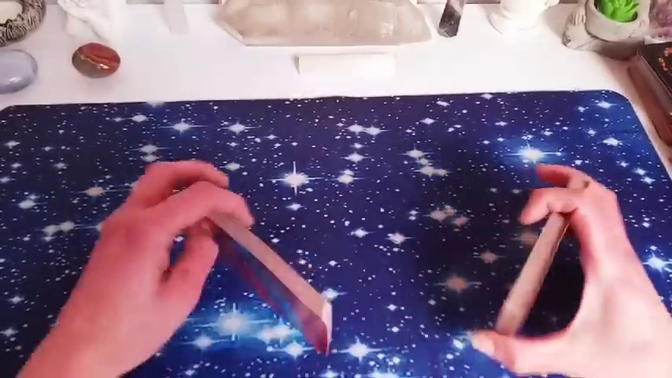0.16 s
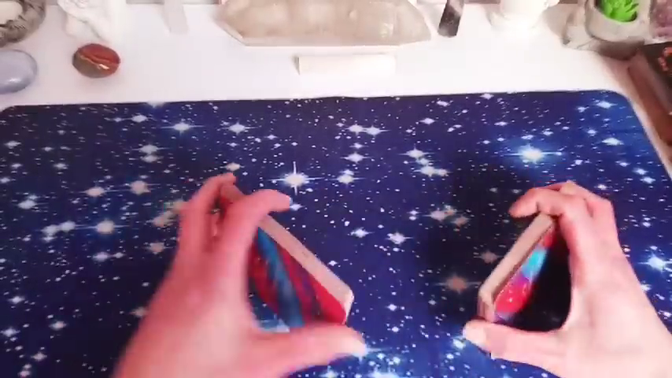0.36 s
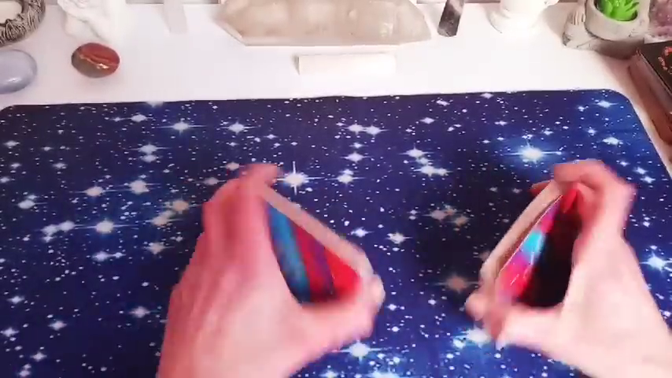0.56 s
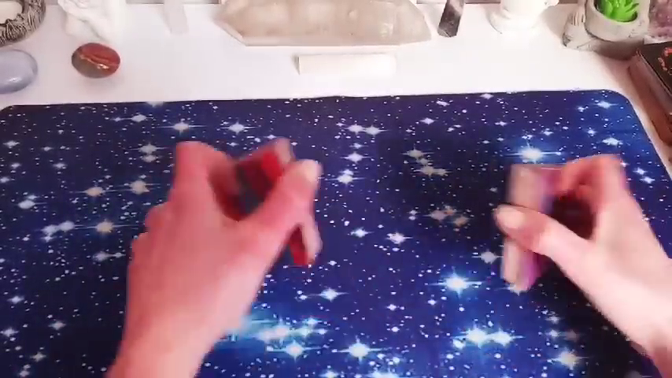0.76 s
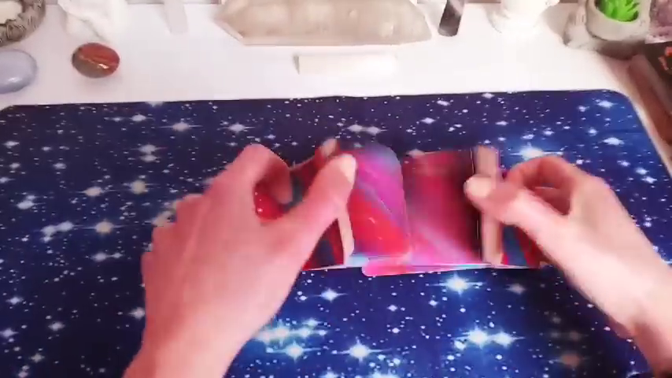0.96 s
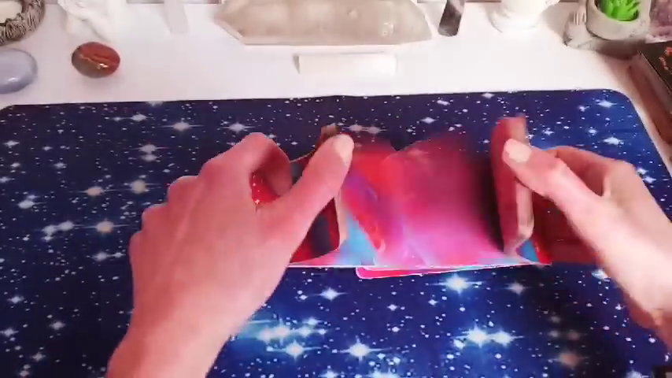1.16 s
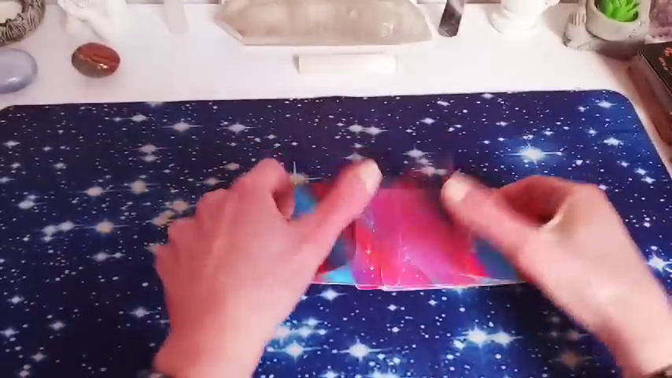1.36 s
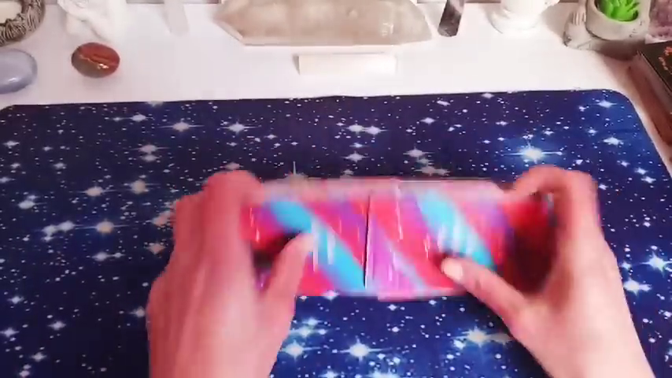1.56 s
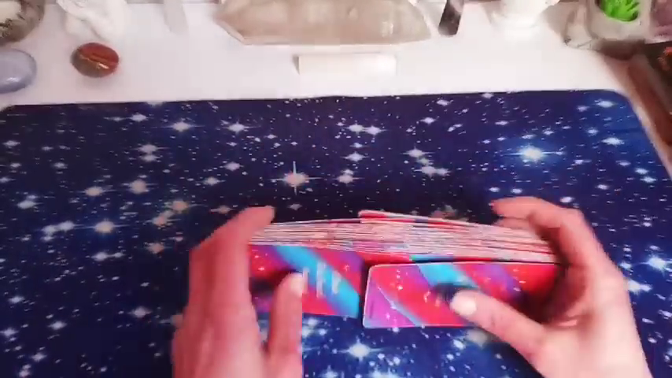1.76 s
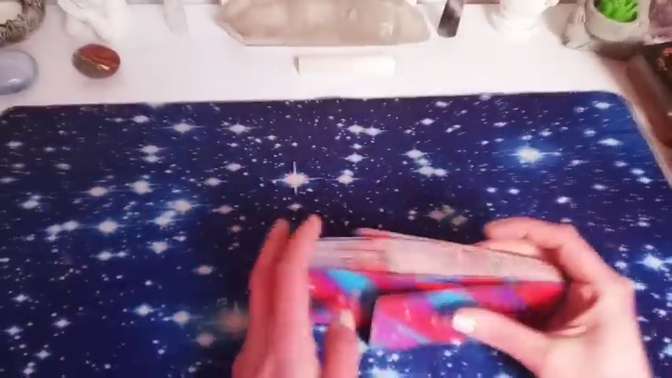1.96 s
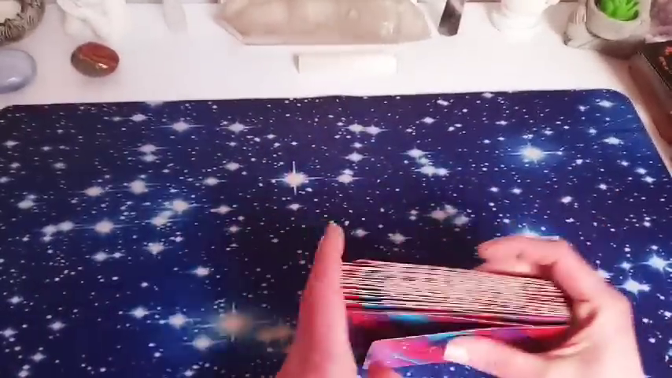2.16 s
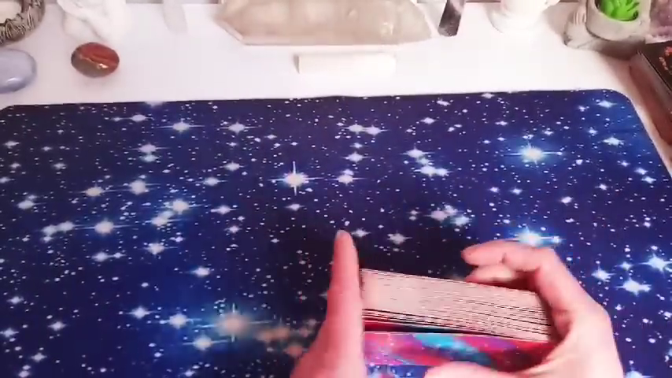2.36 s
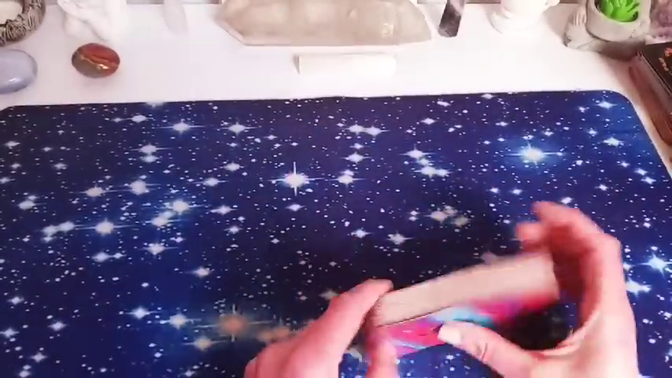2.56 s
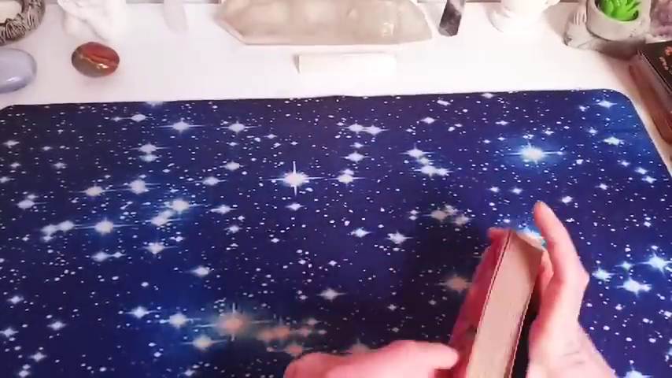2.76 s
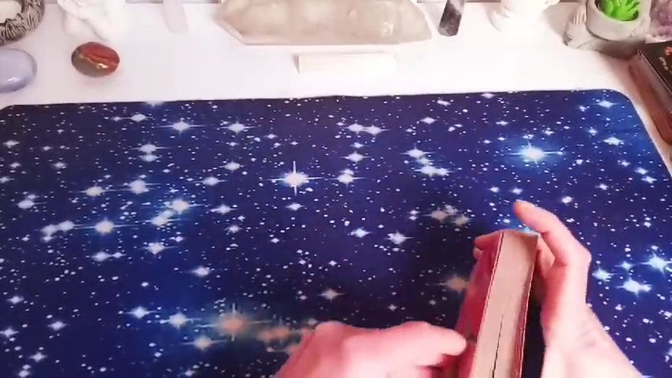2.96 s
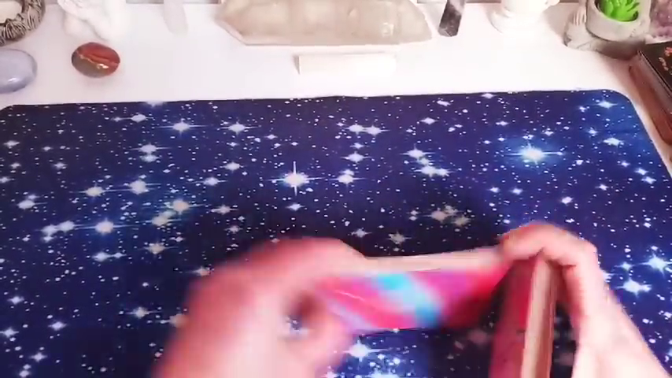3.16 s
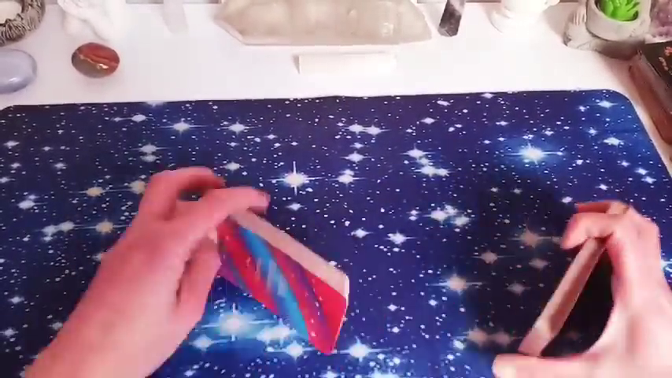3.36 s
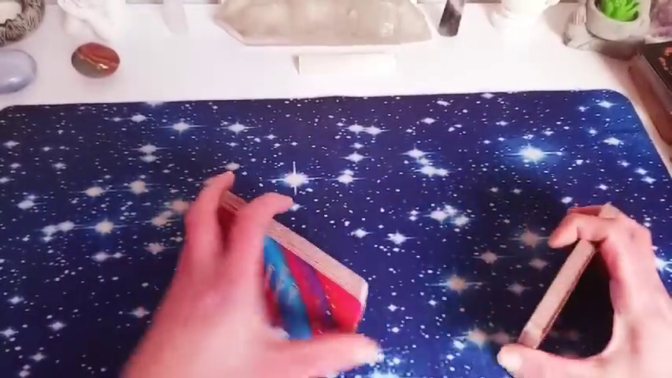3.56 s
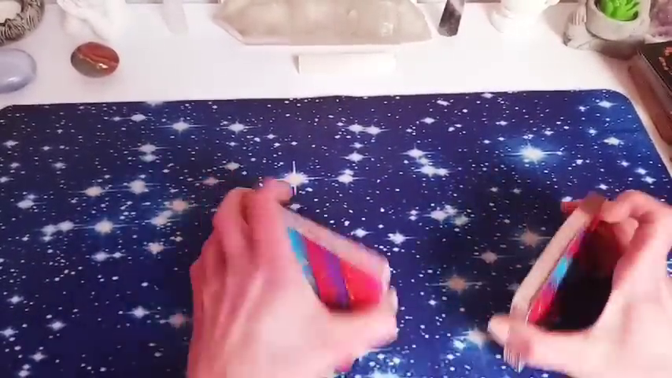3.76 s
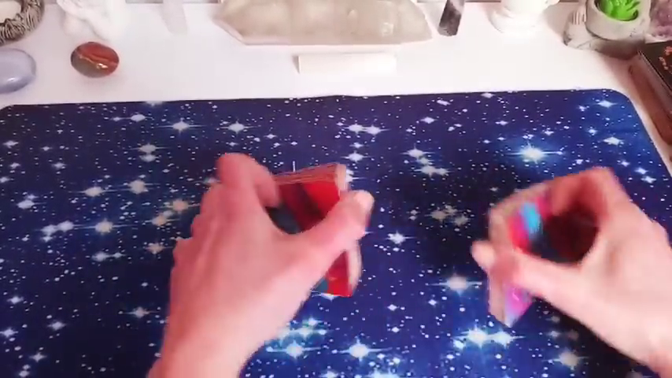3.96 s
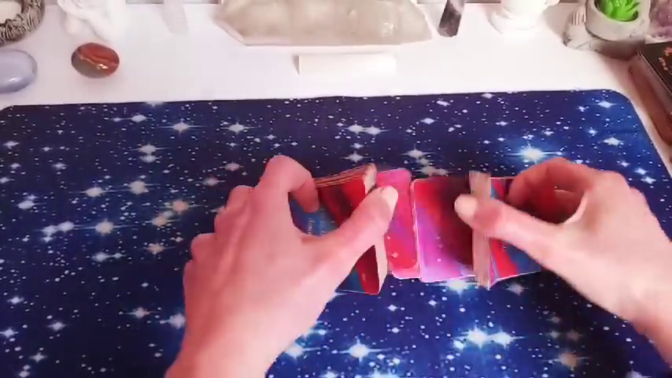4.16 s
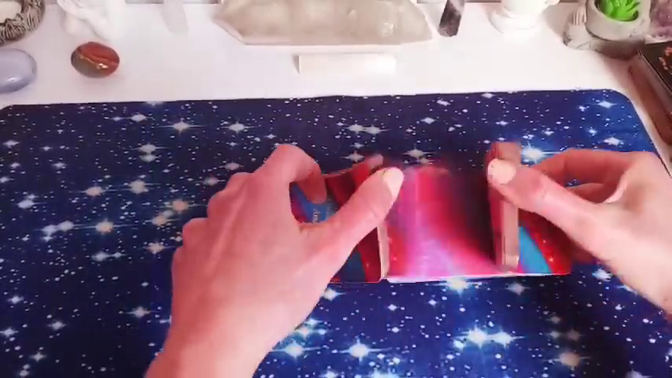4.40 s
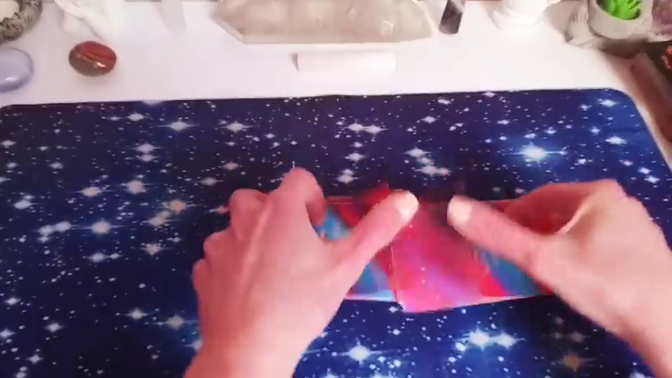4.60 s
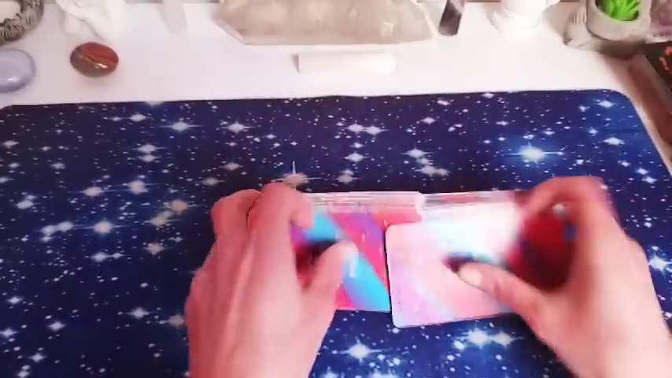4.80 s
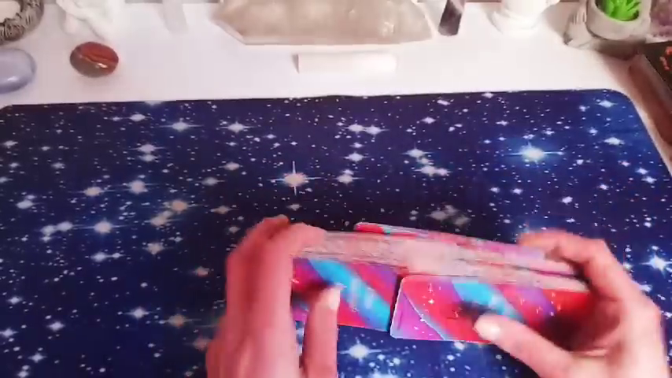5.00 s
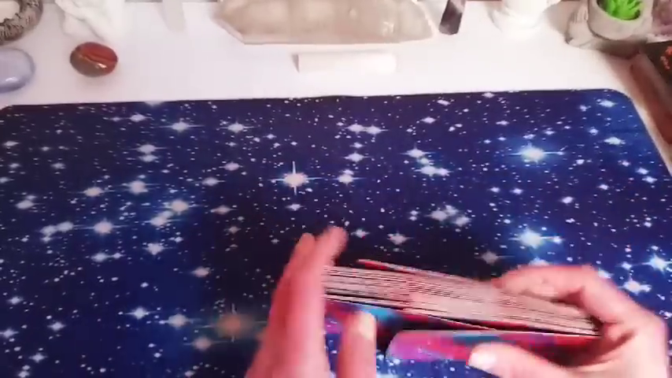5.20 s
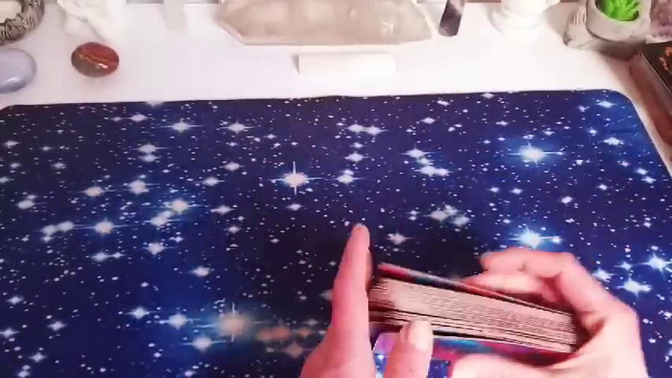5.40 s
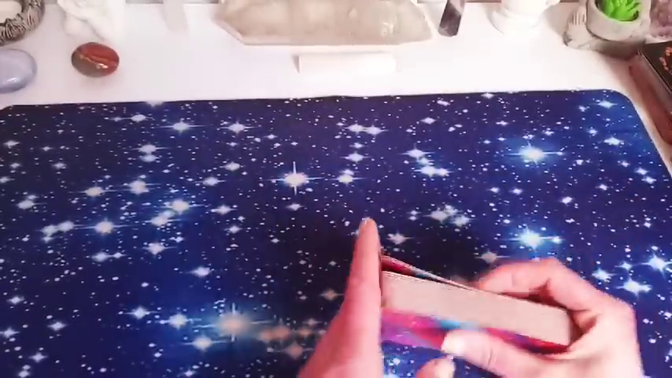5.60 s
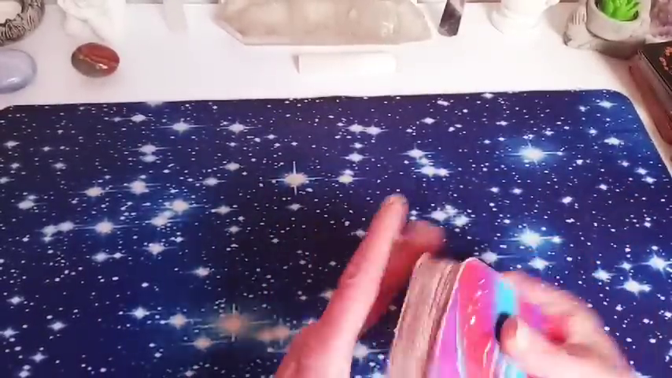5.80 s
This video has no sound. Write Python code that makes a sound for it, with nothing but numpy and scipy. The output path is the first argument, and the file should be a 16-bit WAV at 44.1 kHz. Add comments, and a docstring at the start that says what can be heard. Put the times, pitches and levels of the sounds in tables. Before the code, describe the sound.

A close stereo microphone hears large stiff cards on a soft mat in a quiet room with a short echo and faint hush. At 0.15-0.25 s packets knock down with dull thumps and a clack, then faint rubbing follows. From about 0.9 to 1.4 s a riffle scrapes and cracks in uneven clusters, strongest near 1.0 and 1.1 s, some flat landings giving tiny rising airy chirps. Thumps follow at 1.63-1.7 s, then soft papery strokes as the deck is slid together, a bright solid clack at 2.3 s and a crisper, lighter one at 2.44 s. Quiet rubbing marks the cut around 2.5-3.3 s, with muted bumps near 3.35 s and a light sliding stroke at 3.55 s. A small clack at 4.07 s leads to a denser, louder riffle from 4.15 to 4.63 s, snapping hardest near 4.4 and 4.5 s. Gentle sliding and faint clacks fade out until nearly 5.7 s, over low hand rumble.

```python
"""A deck of large, stiff cards is riffle-shuffled twice on a cloth mat in a quiet room, close to a stereo microphone.
The halves rub and are set down with thumps: noise bursts and decaying sines. In a riffle, cards scrape, flick off
the thumbs (noise bursts) and clap onto the pile, squeezing out short chirps of air (gliding, fluttering tones).
The deck is slid together (granular friction noise), squared with clacks (short modes) and cut, then riffled and
squared again; the hands rumble on the mat (low noise), and echoes and a faint hush lie around it all."""
import sys
import numpy as np
from scipy import signal
from scipy.fft import rfft, irfft
from scipy.io import wavfile
from scipy.ndimage import uniform_filter1d, minimum_filter1d

SR = 44100
rng = np.random.default_rng(int(sys.argv[2]) if len(sys.argv) > 2 else 0)


def put_to_file(sound):
    """Save the sound as 16-bit audio at rate SR, in the file named by the first command-line argument."""
    columns = np.atleast_2d(sound).T  # one column per channel
    safe = np.clip(columns, -1, 1)
    whole_steps = np.round(safe * 32767)
    wavfile.write(sys.argv[1], SR, whole_steps.astype(np.int16))


N = 257544

# cards springing off the thumbs: start_s, level_db (before a common trim), extra_body_db, extra_sheen_db
FLICK_EVENTS = [(0.3528, -41.5, -7, -2), (0.3753, -44.5, -5, 8), (.7074, -52.5, -4, 2),
                (0.8943, -21.5, -2, -4), (0.9107, -22, -5, -2), (.92, -23, -2.5, 5),
                (0.9758, -21.5, -5.5, -5), (.986, -18.5, 3.5, -3.5), (0.9956, -15, -2.5, -0.5),
                (1.0854, -15, 1, 2), (1.1035, -32.5, 5, 9.5), (1.2147, -21, 1.5, 3.5),
                (1.2766, -34.5, 5.5, -2.5), (1.319, -31.5, 2, 2), (1.3295, -25, 3, -1.5),
                (1.341, -25, 1.5, -1), (1.364, -26.5, 0, 5), (1.3806, -18, -15, 10.5),
                (1.3905, -20.5, -2, 1.5), (1.396, -22, 2, 3.5), (3.123, -55.5, -12, -4),
                (3.5476, -41.5, -4.5, -1), (4.129, -43.5, 5.5, 0), (4.153, -16.5, 2.5, -5.5),
                (4.175, -21, -2.5, -2.5), (4.2107, -22, 2, -4), (4.222, -28, -3.5, -2),
                (4.2565, -29.5, -4.5, 3.5), (4.273, -23.5, 0.5, 1.5), (4.2837, -17, -1.5, 2.5),
                (4.3225, -30.5, -2.5, 5.5), (4.3395, -30.5, -2.5, 6), (4.3846, -16.5, 3, -8),
                (4.3943, -16.5, -5.5, 0), (4.4087, -20.5, 5, 7), (4.476, -24.5, -1.5, -0.5),
                (4.5091, -13.5, -7.5, -4), (4.533, -11.5, -12.5, -21.5), (4.543, -15, -7.5, -3),
                (4.547, -13, -4.5, 3), (4.6034, -26, -2, -4.5), (4.6218, -22.5, 3.5, 1.5),
                (4.6268, -28, 5.5, 3)]
# spectrum of a card's crack: frequency_hz, density_db (per Hz)
CARD_SPECTRUM = [(40, -23), (120, -8), (300, 0), (600, 2.5), (1000, 7.5), (1500, 1), (2100, 4), (3000, 4),
                 (4500, 2), (7000, -6.5), (8800, -1.5), (12000, -13.5), (16000, -16.5)]
# left-right likeness of near sounds: frequency_hz, coherence (-1 to 1)
NEAR_COHERENCE = [(100, .93), (1000, .85), (2500, 0.54), (5000, 0.83), (8000, -0.15), (16000, -.05)]
# left-right likeness of diffuse sounds, rubbing and the echo: frequency_hz, coherence (-1 to 1)
FAR_COHERENCE = [(100, .88), (350, 0.94), (700, .42), (1300, -.05), (2400, .15), (4500, -.1), (16000, 0)]

BINS = np.fft.rfftfreq(2048, 1 / SR)  # frequency grid of the colouring filters, Hz
TIME = np.arange(8192) / SR  # time axis of a short event, s


def gain_of(db):
    """Level law: decibels to an amplitude factor."""
    return 10 ** (np.asarray(db) / 20)


def evened(x):
    """Normalization: scales to an rms of 1."""
    return x / np.sqrt(np.mean(x ** 2) + 1e-20)


def read(points, hz):
    """Interpolation of a table on a logarithmic frequency axis."""
    table_hz, value = np.transpose(points)
    return np.interp(np.log(hz + 1), np.log(table_hz + 1), value)


def unit(points):
    """Spectral normalization: a table in dB at BINS with a mean power of 1."""
    db = read(points, BINS)
    return db - 10 * np.log10(np.mean(gain_of(db) ** 2))


def add(mix, s, sound):
    """Superposition: mixes a sound in at time s."""
    part = mix[:, max(round(s * SR), 0):][:, :sound.shape[1]]
    part += sound[:, :part.shape[1]]


def paired(x, coherence):
    """Interchannel coherence: mid and side shares make two unrelated channels alike, by frequency."""
    size = x.shape[1]
    a, b = rfft(x)
    same = read(coherence, np.fft.rfftfreq(size, 1 / SR))
    mid = a * np.sqrt((1 + same) / 2)
    side = b * np.sqrt((1 - same) / 2)
    return irfft(np.array([mid + side, mid - side]), size)


def coloured(x, db):
    """Minimum-phase filter with the gain db at BINS: causal, so nothing rings ahead of a click."""
    log_gain = np.log(gain_of(np.r_[db, db[-2:0:-1]]))
    # the phase is the Hilbert transform of the log gain
    response = np.exp(np.conj(signal.hilbert(log_gain)))
    impulse = np.fft.ifft(response).real
    return signal.oaconvolve(x, impulse[None], axes=1)[:, :x.shape[1]]


def burst(decay, db, rise, span=0.0049):
    """Impact noise: a contact builds up and dies away, with the energy that its spectrum holds over span seconds."""
    shape = np.exp(-TIME / decay) * (1 - np.exp(-TIME / rise))
    contact = paired(rng.standard_normal((2, len(TIME))), NEAR_COHERENCE) * shape
    energy = np.mean(gain_of(db) ** 2) * span * SR
    return evened(coloured(contact, db)) * np.sqrt(energy / len(TIME))


def ring(modes, pitch, rise, spread=.3):
    """Modal decay of a struck body, never quite the same twice; each mode reaches the two sides out of step."""
    t = np.arange(SR // 2) / SR
    tones = np.zeros((2, len(t)))
    for hz, db, t60 in modes:
        drift, skew = rng.standard_normal(2)
        turns = hz * pitch * (1 + .006 * drift) * t
        phase = spread * skew * np.array([[-1], [1]])
        tones += gain_of(db - 60 * t / t60) * np.sin(2 * np.pi * turns + phase)
    return tones * (1 - np.exp(-t / rise))


def friction(per_s, spread_db, grain_share):
    """Stick-slip friction: tiny slips of uneven size in a smooth hiss."""
    slips = rng.random(N) < per_s / SR
    sizes = gain_of(spread_db * np.minimum(rng.exponential(1, N), 4))
    grains = evened(slips * sizes * rng.standard_normal((2, N)))
    hiss = rng.standard_normal((2, N))
    return np.sqrt(grain_share) * grains + np.sqrt(1 - grain_share) * hiss


def swell(start, attack, hold, release_db_per_s):
    """Friction grows with the square of the speed: a hand speeds up smoothly, holds, then the sound dies away."""
    t = np.arange(N) / SR - start
    speed = np.sin(np.pi / 2 * np.clip(t / attack, 0, 1)) ** 2
    return speed ** 2 * gain_of(-release_db_per_s * np.maximum(t - attack - hold, 0))


def hush(spectrum):
    """Diffuse field: broadband noise of the given colour, nearly unrelated between the sides at high frequencies."""
    return coloured(paired(rng.standard_normal((2, N)), FAR_COHERENCE), unit(spectrum))


def slides(slide_db=1.0, sheen_db=2, split_hz=7000, release_db_per_s=159.5):
    """Sliding friction: card faces rub as the deck is pushed together and cut."""
    # strokes of face on face: start_s, speeding_up_s, steady_s, level_db (before the trims),
    # sheen_db (above split_hz, relative to the level)
    strokes = [(-.02, 0.041, 0.21, -64, -6), (.345, .02, 0.028, -54, -7.5), (.39, 0.14, 0.043, -56, -11.5),
               (0.579, 0.059, .07, -72, -16), (.77, 0.079, .02, -68.5, -9), (1.63, 0.026, 0.054, -60, -12),
               (1.784, .145, 0.0095, -52.5, -11.5), (2.036, 0.077, 0.015, -52.5, -11.5),
               (2.195, .11, 0.0041, -53, -12), (2.4, 0.056, .04, -63.5, -11), (2.5, 0.18, .025, -51, -8),
               (2.78, .06, .1, -70.5, -11.5), (2.95, .17, .25, -65, -4), (3.42, 0.056, 0.042, -67.5, -14),
               (3.537, 0.023, 0.23, -53.5, -10), (3.931, 0.15, .07, -62, -12.5),
               (4.91, 0.024, 0.052, -60.5, -11.5), (5.08, .06, 0.031, -62, -12),
               (5.265, .06, 0.041, -57.5, -9.5), (5.44, .06, .015, -68, -16), (5.55, .09, .02, -75, -5.5)]
    # spectrum of rubbing: frequency_hz, density_db (per Hz)
    rub_spectrum = [(290, -42.5), (500, -15), (586, -7.5), (795, -10.5), (880, -4), (1620, -6.5),
                    (2980, -2), (3440, -3), (7210, -11), (8450, -8.5), (10700, -19), (12100, -17),
                    (16000, -26.5)]
    grains = friction(per_s=1900, spread_db=1.8, grain_share=.55)
    rub = evened(coloured(paired(grains, FAR_COHERENCE), read(rub_spectrum, BINS)))
    dull = signal.sosfiltfilt(signal.butter(3, split_hz, fs=SR, output="sos"), rub)
    sheen = evened(rub - dull)
    out = np.zeros((2, N))
    for start, attack, hold, db, bright_db in strokes:
        stroke = gain_of(db) * swell(start, attack, hold, release_db_per_s)
        out += stroke * (gain_of(slide_db) * dull + gain_of(sheen_db + bright_db) * sheen)
    return out


def hands():
    """Low-frequency contact noise: each shift of the hands swells and fades as a rumble through the mat."""
    # shifts of weight: middle_s, half_length_s, level_db
    shifts = [(0.01, 0.096, -63.5), (.51, .13, -63), (.87, 0.045, -67), (1.24, 0.16, -58),
              (2.1, .16, -65.5), (2.39, 0.084, -57.5), (2.8, 0.089, -64), (3.293, .08, -69),
              (3.69, .13, -64.5), (4.02, 0.1, -68.5), (4.48, 0.15, -53.5), (4.97, .1, -62.5),
              (5.48, .13, -65)]
    # spectrum of the rumble: frequency_hz, density_db (per Hz)
    hand_spectrum = [(20, -17), (50, -13.5), (90, -0.5), (135, -3), (185, -18.5), (330, -11), (650, -17),
                     (1200, -16.5), (2200, -26), (5000, -47)]
    t = np.arange(N) / SR
    weight = sum(gain_of(db) * np.exp(-.5 * ((t - middle) / half) ** 2) for middle, half, db in shifts)
    return weight * hush(hand_spectrum)


def thumps(knock_decay=.003, table_db=.5, knock_db=-3.0, mat_rise=0.0021, knock_rise=0.00074, boom_rise=0.0046,
           softening=0.55, sink_s=0.0087, sink_doubling_db=14.5):
    """Impact on a padded plate: the card edges knock, the mat gives a dull slap and the table top booms."""
    # deck and hands bumping the table: start_s, level_db, knock_db (card edges, before the trim), boom_db (table top)
    bumps = [(.002, -62, -13, 13.5), (.152, -28, -1, -7.5), (0.2157, -25, -1.5, -4), (.231, -29.5, -17, -9),
             (1.31, -38.5, -11, -5), (1.341, -34, 8, -17), (1.364, -32, 2, -20), (1.395, -33, 8.5, -26.5),
             (1.628, -37.5, 8.5, -15.5), (1.633, -30.5, 4, -6.5), (1.650, -29.5, -3, -9.5),
             (1.690, -39.5, 0, -15), (2.317, -48, -4, 2), (2.478, -65, -13, 12.5), (2.716, -56, -19, 13),
             (2.745, -58.5, -19, 7), (3.329, -42, -10, 2.5), (3.3748, -41, -0.5, 1.5),
             (3.390, -37.5, -12.5, -21), (4.070, -45, 2, -6.5), (4.275, -41, 10, -25.5),
             (4.323, -39.5, -9, -17), (4.622, -33.5, 1, -18), (4.883, -50.5, 4, 2), (4.908, -46.5, 0, -6),
             (5.33, -50.5, -3, -12)]
    # spectrum of the slap on the mat: frequency_hz, density_db (per Hz)
    mat_spectrum = [(25, -33), (55, -19.5), (110, -5), (180, -8), (280, 0.5), (420, 0), (520, -5),
                    (640, -5), (850, -12), (1500, -24.5), (4000, -49), (16000, -71)]
    # spectrum of the knocking card edges: frequency_hz, density_db (per Hz)
    edge_spectrum = [(100, -17), (500, -3.5), (1200, 1.5), (1700, -6), (2800, -11), (5000, -27.5),
                     (16000, -44)]
    # modes of the table top: pitch_hz (before a factor of 0.99), level_db (before softening), t60_s
    top_modes = [(73.9, -13.5, .28), (93, -2, .32), (131.6, -0.5, 0.24), (228.4, -4.5, 0.22),
                 (285, -7.5, .36), (345, -8, .36), (410, -10, .28), (545, -16, .2)]
    out = np.zeros((2, N))
    for s, db, edge_db, top_db in bumps:
        # the blow sinks in twice as long for each sink_doubling_db less knock
        decay = sink_s * 2 ** (-edge_db / sink_doubling_db)
        slap = gain_of(table_db) * burst(decay, unit(mat_spectrum), mat_rise)
        knock = gain_of(edge_db + knock_db) * burst(knock_decay, unit(edge_spectrum), knock_rise)
        add(out, s, gain_of(db) * (slap + knock))
        # a soft blow, with little knock, stirs the modes above 140 Hz less and less
        soft_db = softening * min(edge_db, 0)  # per octave
        modes = [(hz, mode_db + soft_db * max(np.log2(hz / 140), 0), t60) for hz, mode_db, t60 in top_modes]
        add(out, s, gain_of(db + top_db) * ring(modes, 0.99, boom_rise))
    return out


def taps(tick_db=-15, tick_decay=0.0027, rise=0.00038):
    """Modal ringing of a solid block: the pressed deck clacks, with a papery tick on top."""
    # edge clacks as the deck is gripped and squared: start_s, level_db, pitch_factor (set by the packet's size),
    # crispness_db (of the tick, before a common trim)
    clacks = [(0.1509, -29.5, 1, -10), (0.863, -52, 0.55, -3), (2.307, -21.5, 1, -3.5),
              (2.4425, -34, 0.95, 11), (2.993, -49.5, 0.75, -8), (4.069, -30.5, 0.6, -2),
              (4.8812, -40, .95, -5), (5.08, -56.5, 0.9, -7), (5.2566, -48.5, .88, -7.5),
              (5.2925, -43.5, 0.894, 1), (5.4795, -52.5, .95, -6), (5.503, -40, 0.85, -10),
              (5.511, -47.5, .9, -11), (5.648, -58.5, 1, 5)]
    # modes of the squared deck: pitch_hz (before the pitch factor), level_db, t60_s
    deck_modes = [(1000, -9.5, .018), (1260, -4, .018), (1600, -4.5, .016), (2100, -10, 0.011),
                  (2780, -5, .013), (4150, -14, .01)]
    out = np.zeros((2, N))
    for s, db, pitch, crisp_db in clacks:
        add(out, s, gain_of(db) * ring(deck_modes, pitch, rise))
        tick = burst(tick_decay, read(CARD_SPECTRUM, BINS), rise)
        add(out, s, gain_of(db + crisp_db + tick_db) * tick)
    return out


def rasp(attack=0.014, release_db_per_s=130, bright_db_per_octave=0.2):
    """Edge friction, summed as power: scraping through a riffle, and more as each card drags and skids."""
    # the thumbs let the two halves run: start_s, end_s, level_db (of the scraping)
    riffles = [(0.901, 1.41, -49.5), (4.16, 4.579, -44)]
    # levels relative to the flick's table level; a card takes time to get going, to stop and to build up a drag
    skid_db, skid_rise_s, skid_decay_s = -19.5, .01, 0.035
    drag_db, drag_s = -30, .005
    scrape = paired(friction(per_s=470, spread_db=2.5, grain_share=.7), NEAR_COHERENCE)
    power = np.zeros((1, N))
    for start, end, db in riffles:
        power += (gain_of(db) * swell(start, attack, end - start, release_db_per_s)) ** 2
    t = np.arange(SR // 2) / SR
    skid = gain_of(skid_db) * (1 - np.exp(-t / skid_rise_s)) * np.exp(-t / skid_decay_s)
    # the drag over the thumb grows until the card springs free; then it skids over the pile
    drag = gain_of(drag_db) * np.exp(-TIME[:2048][::-1] / drag_s)
    for s, db, *_ in FLICK_EVENTS:
        add(power, s - len(drag) / SR, (gain_of(db) * np.r_[drag, skid][None]) ** 2)
    octaves = np.log2(np.maximum(BINS / 2000, 1))
    colour = unit(CARD_SPECTRUM) + bright_db_per_octave * octaves
    return np.sqrt(power) * coloured(scrape, colour)


def flicks(body_hz=1400, sheen_hz=7000, flick_db=-.5, decay=0.0041, rise=0.00018, bend_db=2):
    """Release of elastic energy: each card springs free and cracks on the pile; each bend has its own resonances."""
    out = np.zeros((2, N))
    body = 1 / (1 + (BINS / body_hz) ** 4)
    sheen = 1 - 1 / (1 + (BINS / sheen_hz) ** 8)
    bend_hz = np.geomspace(300, 16000, 36)
    for s, db, body_db, sheen_db in FLICK_EVENTS:
        bend = read(np.c_[bend_hz, rng.standard_normal(len(bend_hz))], BINS)
        colour = read(CARD_SPECTRUM, BINS) + body_db * body + sheen_db * sheen + bend_db * bend
        add(out, s, gain_of(db + flick_db) * burst(decay, colour, rise))
    return out


def claps(flutter=.17, flutter_per_db=0.02, spread=0.27, glide_octaves=.36, glide_halving_db=13.5):
    """Air-film resonance: the film under a falling card rings, rising in pitch as the gap closes."""
    # cards landing flat: start_s, level_db, pitch_hz (at the peak of the swell), swell_s (time to the peak)
    landings = [(0.8982, -25.5, 1895, 0.0044), (0.9871, -4.5, 1874, 0.0019), (0.9923, -13.5, 2690, 0.0027),
                (1.0862, -13.5, 1333, 0.0025), (1.3301, -21.5, 2245, 0.0019), (1.3908, -19, 2410, 0.0014),
                (4.1538, -7, 1776, 0.0025), (4.1752, -19.5, 1990, 0.0015), (4.2120, -10, 1854, 0.0023),
                (4.386, -1.5, 2276, .0014), (4.389, -13.5, 2730, 0.0036), (4.403, -12.5, 2370, .003),
                (4.5095, -11.5, 2124, .002), (4.5112, -13.5, 3150, 0.0023), (4.5338, -3, 2550, 0.00075),
                (4.543, -13, 2062, 0.0026), (4.5465, -10.5, 2484, .0017), (4.6215, -20, 975, 0.0023)]
    out = np.zeros((2, N))
    smoothing = np.hanning(60)[None]
    for s, db, hz, swell_s in landings:
        # a 0 dB clap ends up to glide_octaves above its pitch; the glide halves for each glide_halving_db less
        rise = glide_octaves * 2 ** (db / glide_halving_db)
        u = TIME / swell_s
        shape = (u * np.exp(1 - u)) ** 2
        glide_hz = hz * 2 ** (rise * np.tanh(u - 1))
        tone = np.exp(2j * np.pi * np.cumsum(glide_hz) / SR)
        noise = rng.standard_normal((2, len(TIME)))
        a, b = evened(signal.oaconvolve(noise, smoothing, "same", axes=1))
        # weak claps land askew and flutter more
        wobble = 1 + (flutter - flutter_per_db * db) * (a + 1j * b)
        sides = np.exp(1j * spread * rng.standard_normal() * np.array([[-1], [1]]))
        clap = shape * (sides * tone * wobble).real
        clap = evened(clap) * np.sqrt(np.mean(shape ** 2) / 2)
        add(out, s, gain_of(db) * clap)
    return out


def room(x, wet_db=-5, early_db=-7.5, early_decay=0.014, first_echo=0.0046):
    """Reverberation: early echoes off the desk and things on it, then a short tail, each band with its own decay."""
    # decay of the room: frequency_hz, t60_s
    room_t60 = [(80, 0.01), (250, 0.4258), (600, 0.5), (1400, 0.4969), (3500, 0.4664), (9000, 0.38),
                (16000, 0.38)]
    # colour of the echo: frequency_hz, gain_db
    room_colour = [(80, -3), (300, 1), (700, -2), (1500, -2.5), (2500, -3), (5000, 0.5), (9000, -2),
                   (16000, -3)]
    t = np.arange(SR * 3 // 4) / SR
    arrived = np.clip(t / first_echo - 1, 0, 1)
    noise = paired(rng.standard_normal((2, len(t))), FAR_COHERENCE)
    hz, frame_s, bands = signal.stft(noise, SR, nperseg=256)
    decay = gain_of(-60 * frame_s / read(room_t60, hz)[:, None])
    tail = signal.istft(bands * decay, SR, nperseg=256)[1][:, :len(t)]
    signs = rng.choice([-1., 1.], (2, len(t)))
    reflections = signs * (rng.random((2, len(t))) < 1200 / SR)  # 1200 a second
    early = paired(reflections, FAR_COHERENCE) * np.exp(-t / early_decay)
    echo = gain_of(wet_db) * evened(tail * arrived) + gain_of(early_db) * evened(early * arrived)
    echo = coloured(echo / np.sqrt(len(t)), read(room_colour, BINS))
    return signal.fftconvolve(x, echo, axes=1)[:, :N]


def scene(right_db=0.5, clap_echo_db=-2.0, quiet_db=-73):
    """Superposition of direct sound and echo: the cards, slightly to the right, in the quiet room."""
    # spectrum of the quiet room: frequency_hz, density_db (per Hz)
    quiet_spectrum = [(20, -9), (100, 4), (190, -8.5), (400, -3), (700, -1), (1200, -2), (2500, -12.5),
                      (6000, -16.5), (10000, -25), (16000, -31.5)]
    side = gain_of([[-right_db], [right_db]])
    cards = side * (slides() + thumps() + taps() + rasp() + flicks())
    air = side * claps()
    echo = room(cards + gain_of(clap_echo_db) * air)
    return cards + air + echo + hands() + gain_of(quiet_db) * hush(quiet_spectrum)


def record(dry, bass_hz=50, edge_hz=16000):
    """Transducer limits: the microphone sheds deep bass, a limiter rounds off peaks at full scale; then a lowpass."""
    thin = signal.sosfilt(signal.butter(2, bass_hz, "highpass", fs=SR, output="sos"), dry)
    allowed = 1 / np.maximum(abs(thin).max(0), 1)
    # the gain dips smoothly around a peak, over 89 samples (2 ms) a step
    limited = thin * uniform_filter1d(minimum_filter1d(allowed, size=89), size=89)
    lowpass = signal.firwin(511, edge_hz, window=("kaiser", 9), fs=SR)
    return signal.oaconvolve(limited, lowpass[None], "same", axes=1)


dry = scene()
out = record(dry)
put_to_file(out)
```